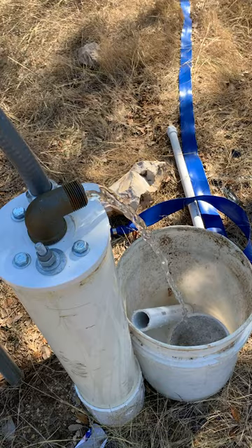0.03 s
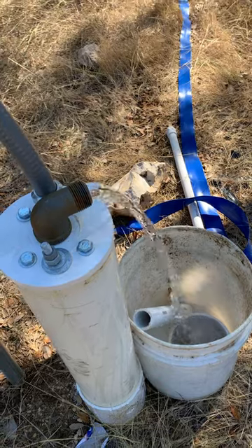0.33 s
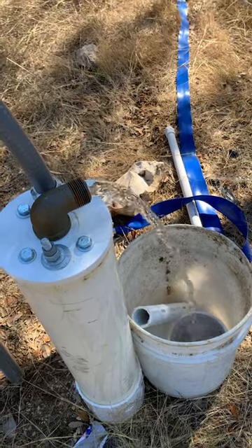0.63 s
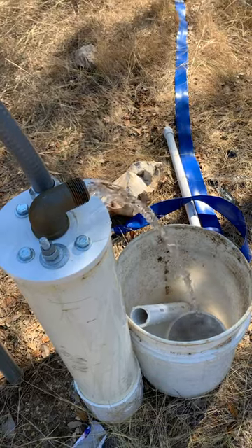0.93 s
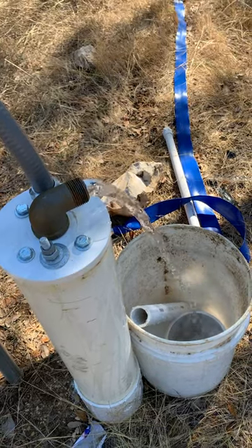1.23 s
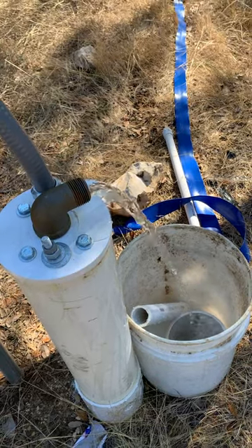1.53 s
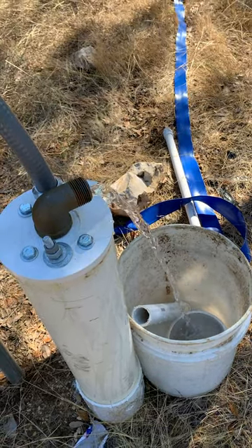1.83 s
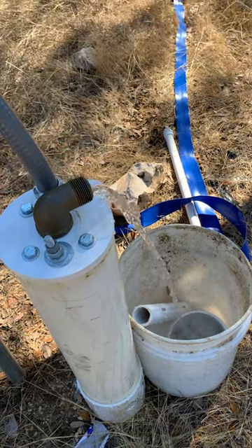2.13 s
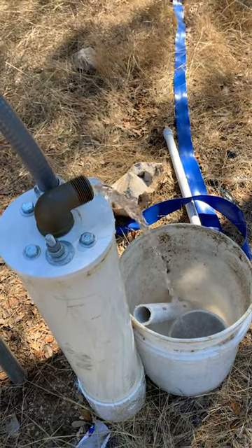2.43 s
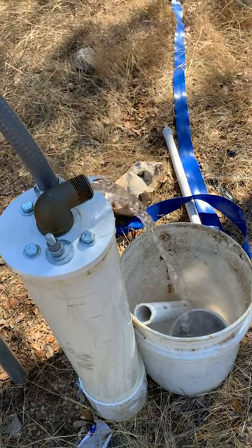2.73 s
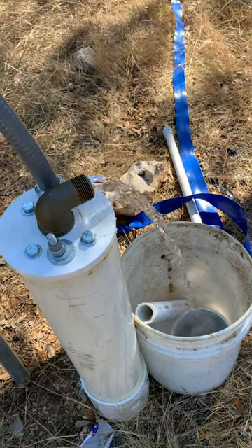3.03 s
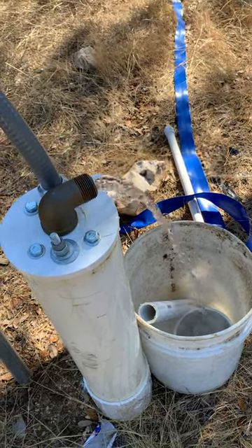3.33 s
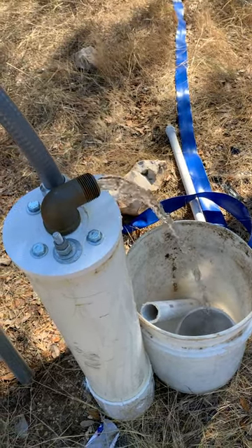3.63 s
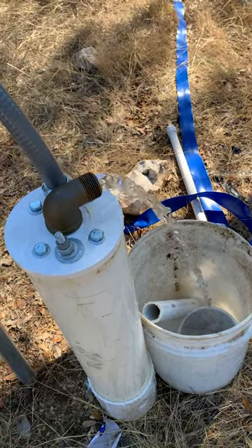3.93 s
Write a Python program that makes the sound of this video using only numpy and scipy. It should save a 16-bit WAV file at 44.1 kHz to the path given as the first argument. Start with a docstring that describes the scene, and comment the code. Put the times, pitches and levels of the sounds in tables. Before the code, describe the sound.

A broken stream of water from a pump splashes and bubbles in a plastic bucket.

```python
"""Water spatters and gurgles close by: a pump outlet gushing unevenly into a plastic bucket, outdoors.
The broken stream slaps the bottom and drives short-lived bubbles under; the bucket colours both,
and the air in it drums under the heavier slugs of water. A light breeze rumbles on the microphone."""
import sys
import numpy as np
from scipy import signal
from scipy.fft import rfft, irfft
from scipy.io import wavfile

SR = 44100
rng = np.random.default_rng(int(sys.argv[2]) if len(sys.argv) > 2 else 0)


def to_wav(s):
    """Save 16-bit WAV."""
    ch = np.atleast_2d(s).T  # columns
    pcm = np.round(np.clip(ch, -1, 1) * 32767)  # PCM
    wavfile.write(sys.argv[1], SR, pcm.astype(np.int16))


N = 176400
TIME = np.arange(N) / SR
GRAIN_AGE_S = TIME[:SR // 40]


def from_db(db):
    """Decibels to gain."""
    return 10 ** (np.asarray(db) / 20)


def unit_rms(x):
    """Scale to unit rms."""
    return x / np.sqrt(np.mean(x ** 2) + 1e-20)


def level(rows):
    """Gain over time from (time_s, level_db) points."""
    return from_db(np.interp(TIME, *np.transpose(rows)))


def on_bins(rows, column=1):
    """Table column interpolated over log frequency onto the bins of a 2N transform."""
    rows = np.array(rows)
    bin_hz = np.arange(1, N + 2) * SR / (2 * N)
    return np.interp(np.log(bin_hz), np.log(rows[:, 0]), rows[:, column])


def coloured(x, rows):
    """Minimum-phase filter from (freq_hz, gain_db) points."""
    cepstrum = irfft(np.log(from_db(on_bins(rows))))
    cepstrum[1:N] *= 2
    cepstrum[N + 1:] = 0
    return irfft(rfft(x, 2 * N) * np.exp(rfft(cepstrum)))[..., :N]


def drift(rate_hz):
    """Slow random wander, unit rms."""
    pole = np.exp(-2 * np.pi * rate_hz / SR)
    wander = signal.lfilter([1], [1, -2 * pole, pole * pole], rng.standard_normal(N + SR))
    return unit_rms(wander[SR:])


def placed(start_s, grains):
    """Sum of short sounds, one a row, each at its start time."""
    at = (np.maximum(start_s, 0) * SR).astype(int)[:, None] + np.arange(grains.shape[1])
    return np.bincount(at.ravel(), grains.ravel(), N)[:N]


def random_events(per_s, spread_db):
    """Uniform start times and clipped log-normal sizes."""
    count = int(per_s * N / SR)
    return rng.random(count) * N / SR, from_db(spread_db * np.clip(rng.standard_normal(count), -2, 2))


def splashes(start_s, sizes, attack_s, decay_s):
    """Each impact is a brief burst of spray. Rows: shared, diffuse left, diffuse right."""
    shape = (1 - np.exp(-GRAIN_AGE_S / attack_s)) ** 2 * np.exp(-GRAIN_AGE_S / np.reshape(decay_s, (-1, 1)))
    shape /= shape.max(axis=1, keepdims=True)
    power = placed(start_s, (sizes[:, None] * shape) ** 2)
    return np.sqrt(power) * rng.standard_normal((3, N))


def bubble_rings(start_s, sizes, pitch_hz, decay_cycles=10, swell_cycles=0.48, rise_per_s=12.1):
    """Each bubble swells, rings and rises in pitch, with its own phase in each of the three rows."""
    cycles = pitch_hz[:, None] * GRAIN_AGE_S
    shape = (1 - np.exp(-cycles / swell_cycles)) * np.exp(-cycles / decay_cycles)
    chirp = np.exp(2j * np.pi * cycles * (1 + rise_per_s * GRAIN_AGE_S / 2))
    ring = sizes[:, None] * shape / shape.max() * chirp
    phases = np.exp(2j * np.pi * rng.random((len(start_s), 3)))
    return np.array([placed(start_s, (ring * phase[:, None]).imag) for phase in phases.T])


# Spatter strength: time_s, level_db
SPATTER = [(0.05, -37.5), (0.23, -41), (0.39, -37), (0.49, -42), (0.55, -41), (0.85, -42), (0.87, -48),
           (0.9, -42), (0.95, -44.5), (1.06, -43.5), (1.18, -46.5), (1.22, -39), (1.35, -42), (1.54, -40),
           (2.13, -44.5), (2.25, -39.5), (2.47, -41.5), (2.58, -41.5), (2.67, -39.5), (2.88, -41.5),
           (2.91, -38), (3.01, -42.5), (3.18, -43), (3.33, -37.5), (3.55, -43), (3.64, -41), (3.9, -47),
           (4.0, -42.5)]


def spray():
    """Countless drops and tiny pinging bubbles over a fine mist."""
    start_s, sizes = random_events(per_s=400, spread_db=6)
    drops = unit_rms(splashes(start_s, sizes, attack_s=0.0011, decay_s=0.0024))
    start_s, sizes = random_events(per_s=380, spread_db=4)
    pitch_hz = rng.uniform(3120, 13690, len(start_s))
    pings = unit_rms(bubble_rings(start_s, sizes * np.sqrt(pitch_hz), pitch_hz, decay_cycles=11.3))
    mist = rng.standard_normal((3, N))
    return (drops + from_db(-5) * pings + from_db(-12) * mist) * level(SPATTER) * from_db(7)


def sloshes(start_s, sizes, band_hz=(360, 2430)):
    """Dull splashes of water on water."""
    band = signal.butter(2, band_hz, "band", fs=SR, output="sos")
    return signal.sosfilt(band, splashes(start_s, sizes, attack_s=0.0012, decay_s=0.0061))


# Churn strength: time_s, level_db
CHURN = [(0.05, -43.5), (0.09, -51.5), (0.12, -41.5), (0.22, -49.5), (0.3, -39), (0.45, -42.5),
         (0.6, -45.5), (0.68, -40), (0.76, -47), (0.82, -41.5), (0.87, -43.5), (1.39, -44), (1.44, -43),
         (1.66, -42), (1.74, -46), (1.81, -45), (1.98, -43), (2.1, -44.5), (2.22, -42.5), (2.47, -46),
         (2.7, -43), (2.81, -39.5), (2.83, -49), (2.87, -42.5), (3.05, -45), (3.11, -40.5), (3.28, -47),
         (3.34, -39), (3.4, -42), (3.49, -39), (3.62, -45), (3.66, -43.5), (3.91, -47), (3.96, -42.5),
         (4.0, -44)]


def churn():
    """The stream sloshes the water and drives bubbles of all sizes under."""
    sloshing = unit_rms(sloshes(*random_events(per_s=140, spread_db=2)))
    start_s, sizes = random_events(per_s=800, spread_db=3.5)
    pitch_hz = rng.uniform(477.6, 5205, len(start_s))
    bubbles = unit_rms(bubble_rings(start_s, sizes * pitch_hz ** 0.17, pitch_hz))
    return (from_db(1) * bubbles + from_db(-1) * sloshing) * level(CHURN)


AIR_HZ, AIR_WIDTH_HZ = 194, 98.8
# Drive on the air in the bucket: time_s, level_db
STIR = [(0.05, -41), (0.57, -37.5), (0.61, -43), (1.49, -40.5), (3.07, -42.5), (3.2, -35), (3.22, -44.5),
        (3.62, -40), (3.7, -44.5), (4.0, -45.5)]


def stirred_air(flutter_db=3.5):
    """The stream stirs the bucket's lowest resonance."""
    band_hz = [AIR_HZ - AIR_WIDTH_HZ / 2, AIR_HZ + AIR_WIDTH_HZ / 2]
    band = signal.butter(3, band_hz, "band", fs=SR, output="sos")
    drive = rng.standard_normal((3, N)) * from_db(flutter_db * drift(rate_hz=12.5))
    return unit_rms(signal.sosfilt(band, drive)) * level(STIR) * from_db(1.5)


# Breeze strength: time_s, level_db
BREEZE = [(0.06, -60), (1.2, -56), (2.05, -53.5), (2.2, -45), (2.36, -51), (2.85, -46.5), (3.03, -61),
          (4.0, -65)]
# Spectrum of breeze and far outdoor hush: freq_hz, gain_db
WIND_COLOUR = [(15, -17), (30, -9), (48, 0.5), (75, -3), (110, -4.5), (160, -14), (260, -32), (1000, -60)]


def wind(flutter_db=3.5):
    """Lumpy low rumble on the microphone, separate in each channel."""
    gusts = rng.standard_normal((2, N)) * from_db(flutter_db * drift(rate_hz=7.2))
    return unit_rms(coloured(gusts, WIND_COLOUR)) * level(BREEZE) * from_db(6)


# Sharpest slaps: start_s, level_db, decay_s
SLAPS = [(0.0492, -28.5, 0.0015), (0.095, -29, 0.0013), (0.307, -27.5, 0.0025), (0.3772, -28, 0.0014),
         (0.5166, -26, 0.0015), (0.7156, -21, 0.00085), (0.8852, -22, 0.0014), (0.9378, -33, 0.0015),
         (1.0058, -27, 0.0022), (1.0298, -21.5, 0.001), (1.053, -30.5, 0.002), (1.1060, -27.5, 0.0015),
         (1.216, -28.5, 0.0025), (1.3683, -25, 0.0014), (1.3924, -23.5, 0.0017), (1.469, -24, 0.001),
         (1.6413, -27.5, 0.002), (1.8436, -30, 0.0018), (2.3507, -31.5, 0.0016), (2.7973, -26.5, 0.0016),
         (2.8504, -26.5, 0.0015), (3.0741, -19.5, 0.00027), (3.1334, -23.5, 0.0012),
         (3.3253, -26.5, 0.0022), (3.342, -32, 0.0025), (3.559, -27.5, 0.00092), (3.5904, -23.5, 0.00027),
         (3.61, -26.5, 0.0014), (3.7238, -27, 0.0011)]


def slaps(attack_s=0.00078):
    """Lumps of water hit the bottom; each throws up a little spray."""
    start_s, level_db, decay_s = np.transpose(SLAPS)
    hits = splashes(start_s, from_db(level_db + 8), attack_s, decay_s)
    thrown = splashes(start_s, from_db(level_db - 4.5), attack_s, decay_s=0.0042)
    return hits + thrown


def stream_breaks(dip_db=-4.5, lead_s=0.011, width_s=0.0048):
    """Spray gain: the stream thins just ahead of each slap."""
    offset = (TIME - np.array(SLAPS)[:, :1] + lead_s) / width_s
    return from_db(dip_db * np.exp(-np.min(offset ** 2, axis=0)))


# Loudest bubbles: start_s, level_db, pitch_hz
PLOPS = [(0.155, -38.5, 1410), (0.309, -33, 1384), (0.647, -40.5, 960), (0.805, -34.5, 1560),
         (0.963, -36.5, 1470), (1.063, -36, 1490), (1.081, -34.5, 1450), (1.423, -27, 1105),
         (1.698, -35, 985), (1.781, -34.5, 1440), (1.895, -28.5, 1307), (2.05, -40, 1320),
         (2.299, -35.5, 986), (2.36, -37, 1390), (2.443, -33, 1464), (2.608, -36, 980), (2.612, -35.5, 625),
         (2.645, -39, 1320), (2.651, -36.5, 970), (2.688, -27, 2810), (2.847, -36, 1550),
         (3.101, -36, 1327), (3.33, -37.5, 683), (3.336, -36, 1434), (3.367, -33, 3350), (3.563, -32, 1474),
         (3.592, -38, 610), (3.615, -31.5, 1850)]


def plops():
    """Single bubbles ring, each with the gulp of water closing over it."""
    start_s, level_db, pitch_hz = np.transpose(PLOPS)
    gulps = sloshes(start_s, from_db(level_db + 5.5))
    return gulps + bubble_rings(start_s, from_db(level_db + 3), pitch_hz)


# Heavy slugs of water: start_s, level_db
SLUGS = [(0.351, -28), (0.469, -25), (0.520, -27), (1.011, -22), (1.326, -34), (3.138, -21.5), (3.193, -31)]


def slug_thumps(peak_s=0.00405):
    """Each slug strikes the bucket's lowest resonance."""
    start_s, level_db = np.transpose(SLUGS)
    age_s = TIME[:SR // 8]
    envelope = age_s / peak_s * np.exp(1 - age_s / peak_s)
    thump = envelope * np.sin(2 * np.pi * AIR_HZ * age_s)
    return placed(start_s, from_db(level_db + 3.5)[:, None] * thump)


# Bucket resonance curve: freq_hz, gain_db
BUCKET = [(360, -3.5), (440, -0.5), (520, -10), (640, 1), (780, -7.5), (900, -7), (1000, 0.5), (1180, -10),
          (1350, -0.9), (1600, -2.5), (1800, -7.5), (2000, -1), (2330, 2.5), (2700, -3), (2900, -0.5),
          (3320, 0), (3700, -7.5), (4300, -1.5), (5200, -2.5), (6400, -2.5), (8500, -6), (9900, -7.5),
          (12300, -7.5), (15500, -13)]


def bucket(water, echo_db=-6, decay_s=0.0059, highpass_hz=2200):
    """Treble bounces between the walls, adding fine resonances to the bucket's broad ones."""
    echoes = np.sin(2 * np.pi * rng.random(len(GRAIN_AGE_S))) * np.exp(-GRAIN_AGE_S / decay_s)
    echoes = signal.sosfilt(signal.butter(2, highpass_hz, "high", fs=SR, output="sos"), echoes)
    echoes *= from_db(echo_db) / np.linalg.norm(echoes)
    reflected = signal.oaconvolve(water, echoes[None], axes=1)[:, :N]
    return coloured(water + reflected, BUCKET)


# Stereo widening: freq_hz, left_lead_rad, diffuse_share_db
WIDENING = [(200, 3.75, -11.3), (260, 2.81, -9.1), (400, 0.81, -6.2), (550, -0.3, -2.8), (790, 1.32, -10.5),
            (1000, -0.02, -12.9), (1350, 0.01, -17.7), (1680, 0.04, -9.2), (2200, 2.25, -8.5),
            (2700, 3.14, -25), (3200, 3.68, -6.2), (3650, 5.45, -4.1), (4200, 3.56, -3.8),
            (4900, 3.21, -5.5), (5900, 5.1, -6.9), (7200, 6.35, -12.9), (8500, 8.01, -8.5),
            (9800, 9.44, -16.4), (11200, 11.26, -8.6), (12500, 12.66, -15.0), (15000, 15.73, -15.0)]


def widened(water):
    """Phone-style stereo widening: each frequency gets a left-right phase offset and a diffuse share."""
    spectra = rfft(water, 2 * N)
    share = np.clip(from_db(on_bins(WIDENING, column=2)), 0, 1)
    lead = np.exp(.5j * on_bins(WIDENING) * np.array([[1], [-1]]))
    return irfft(np.sqrt(1 - share ** 2) * lead * spectra[0] + share * spectra[1:])[:, :N]


def scene(edge_hz=4690, body_db=-11.5):
    """Bright spatter, bubbling and drumming in the bucket, plus the breeze; stereo."""
    spatter = spray() * stream_breaks() + slaps()
    bright = coloured(spatter, [(edge_hz / 2, body_db), (edge_hz * 1.714, 0)])
    water = bucket(bright + churn() + plops()) + stirred_air()
    water[0] += slug_thumps()  # shared row only
    return widened(water) + wind()


def record(dry, start_s=0.035, fade_s=0.003, cutoff_hz=15700):
    """Quick fade-in, steep low-pass."""
    opened = dry * np.clip((TIME - start_s) / fade_s, 0, 1)
    return signal.sosfilt(signal.ellip(10, .2, 70, cutoff_hz, fs=SR, output="sos"), opened)


dry = scene()
out = record(dry)
to_wav(out)
```